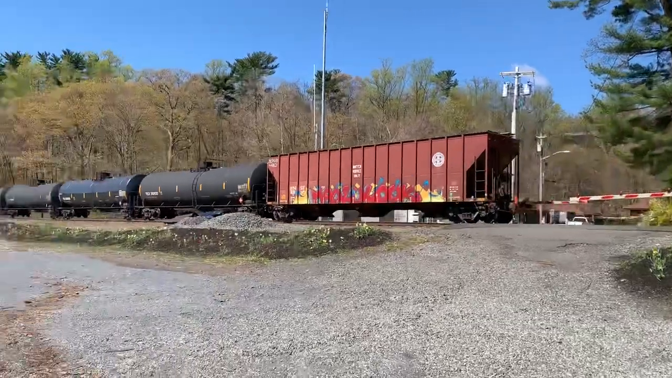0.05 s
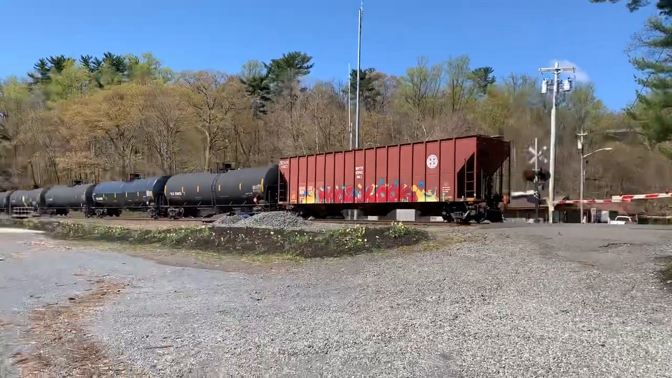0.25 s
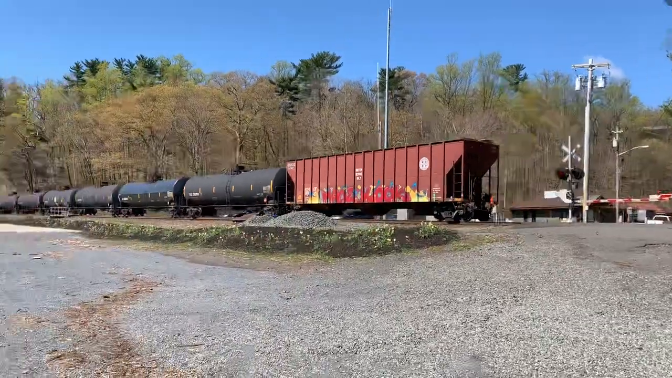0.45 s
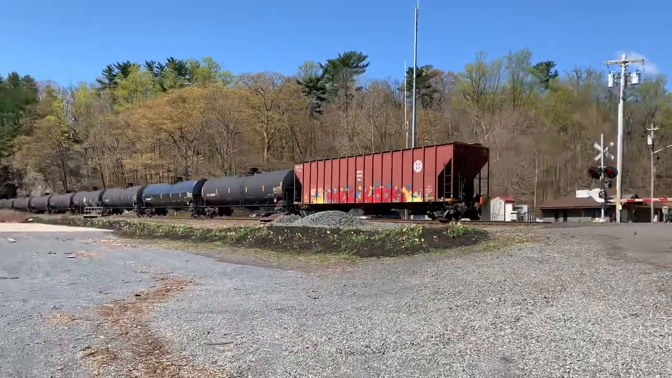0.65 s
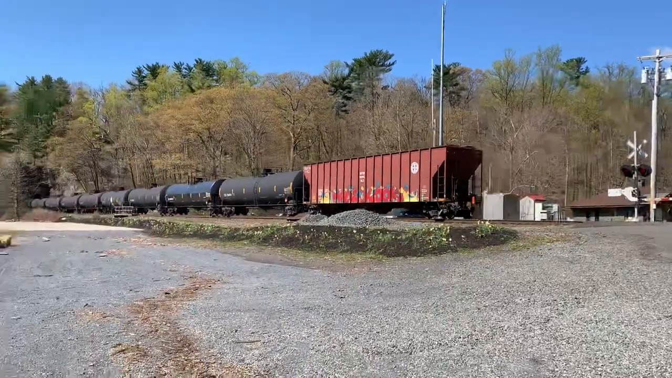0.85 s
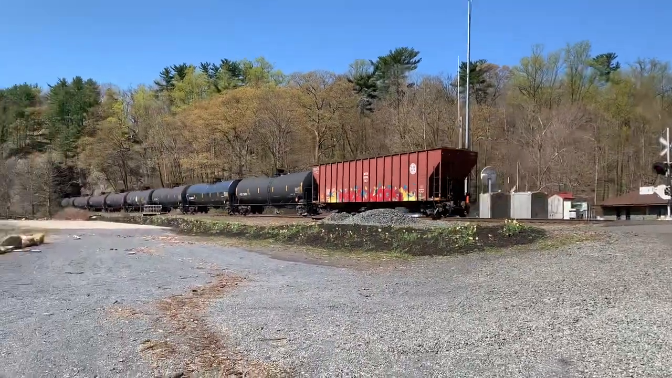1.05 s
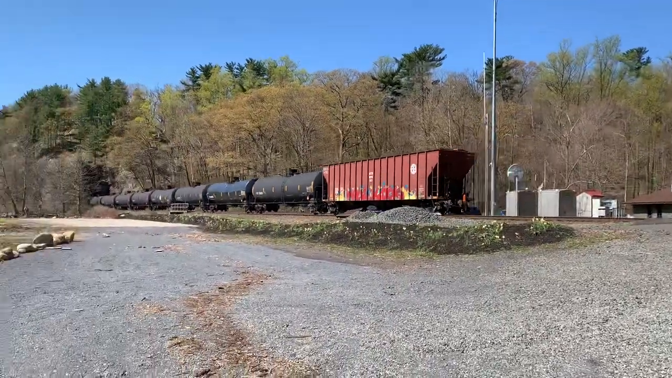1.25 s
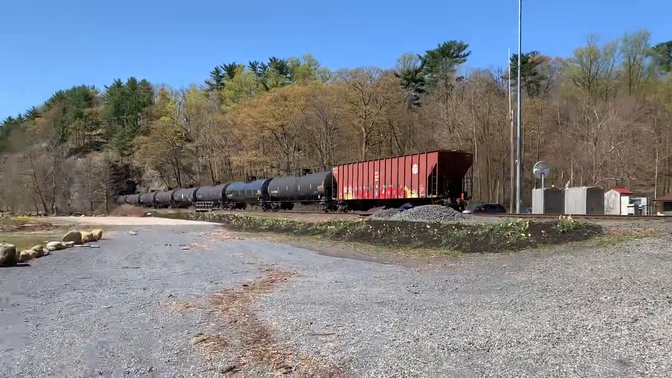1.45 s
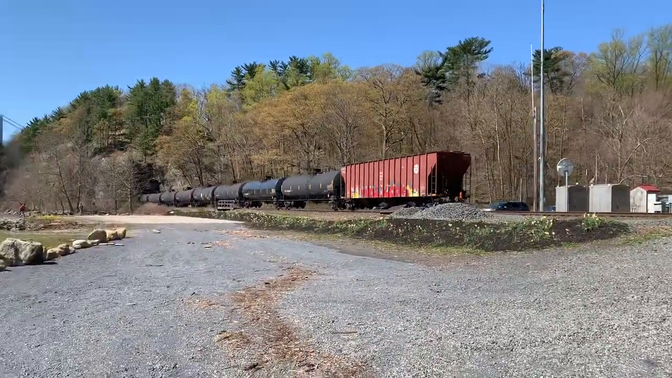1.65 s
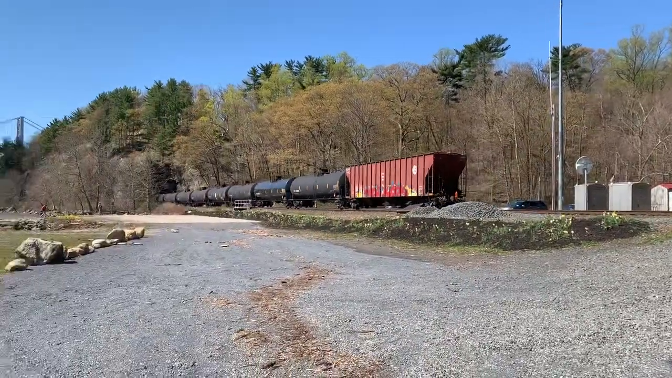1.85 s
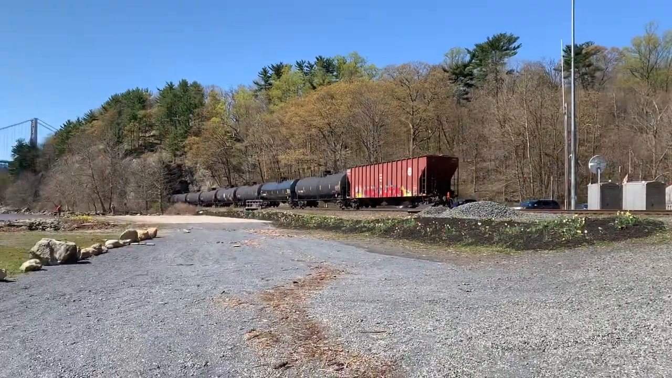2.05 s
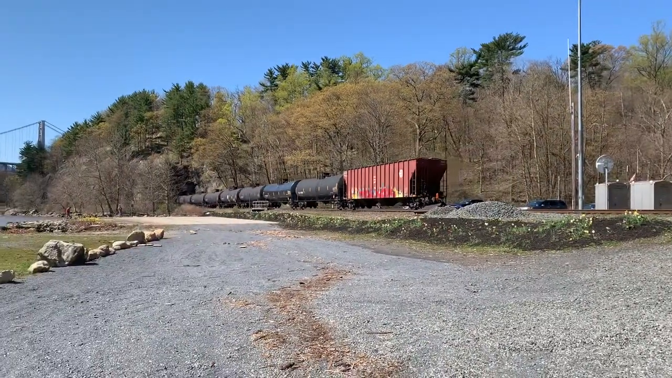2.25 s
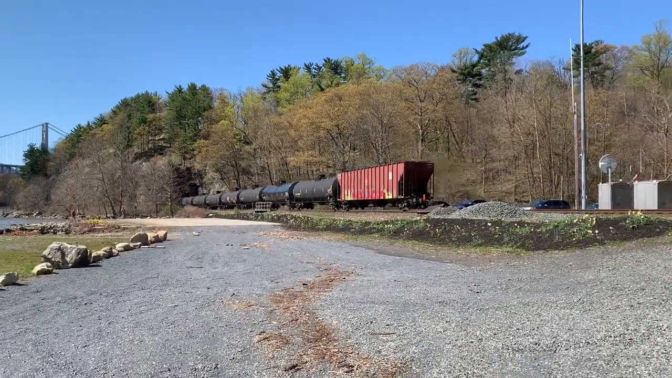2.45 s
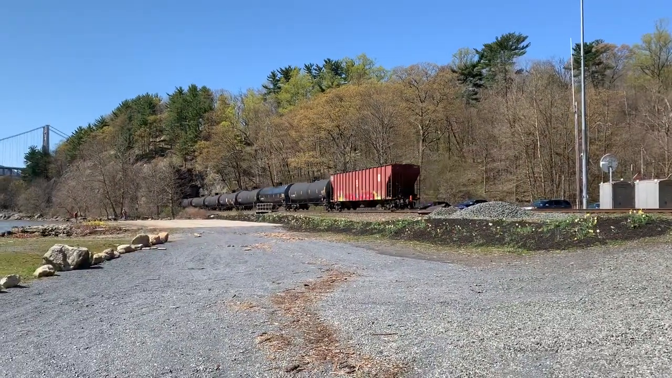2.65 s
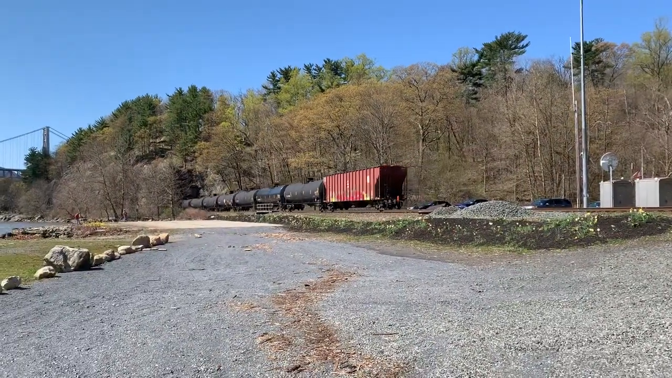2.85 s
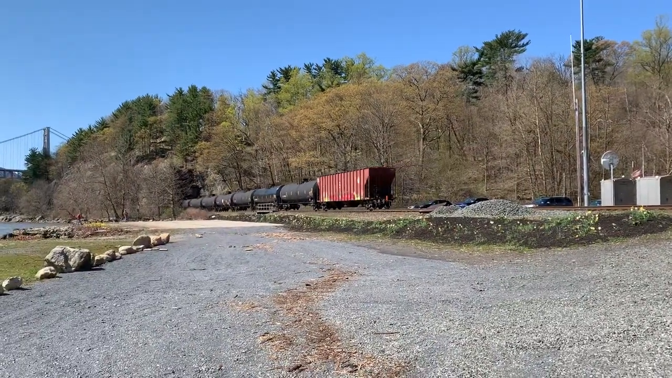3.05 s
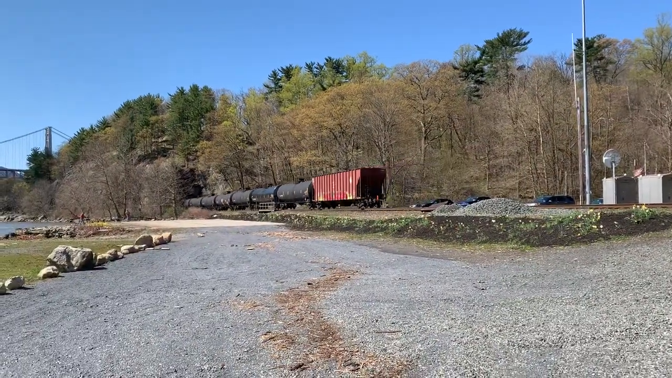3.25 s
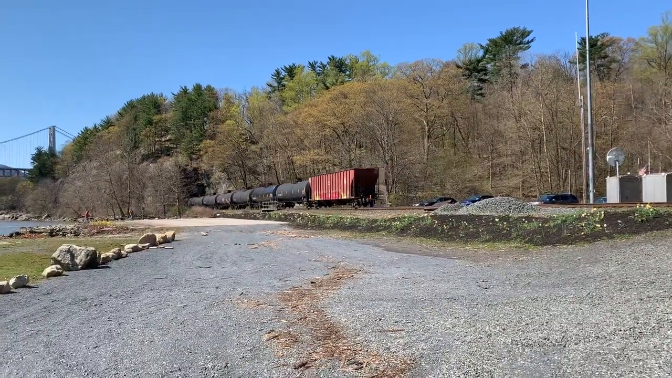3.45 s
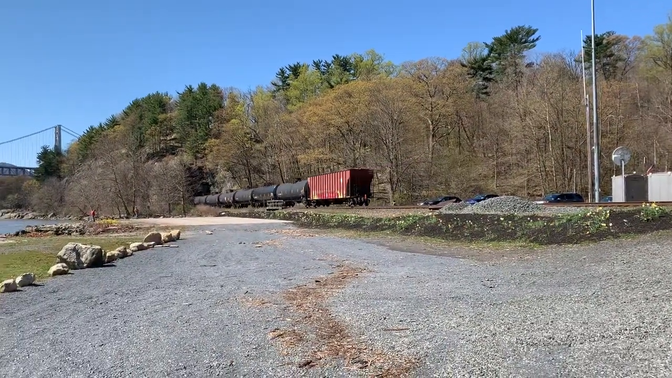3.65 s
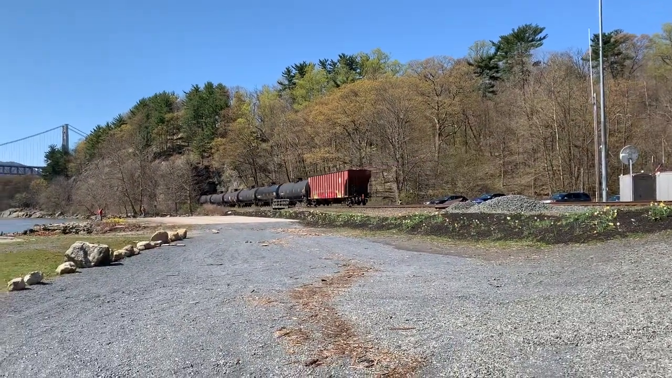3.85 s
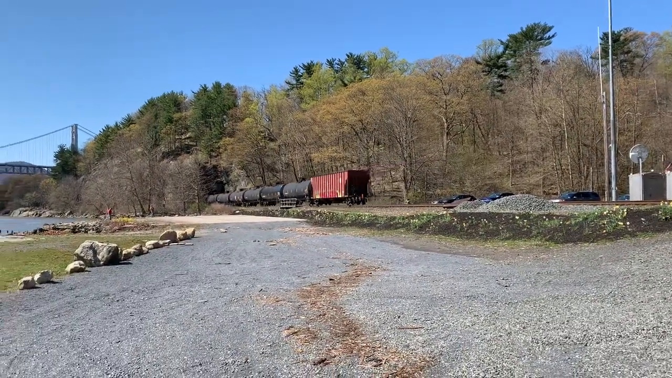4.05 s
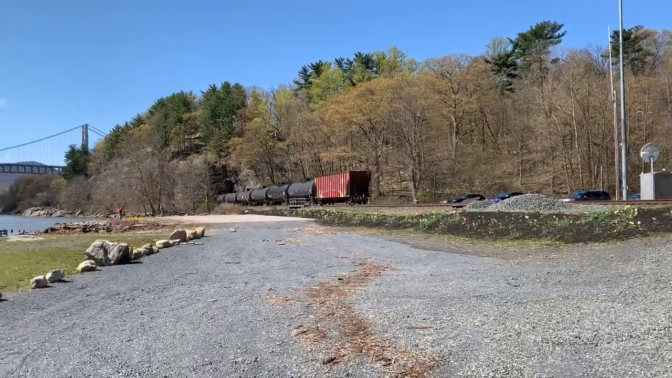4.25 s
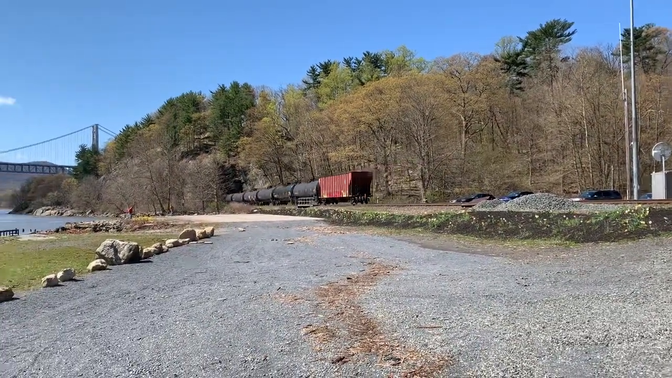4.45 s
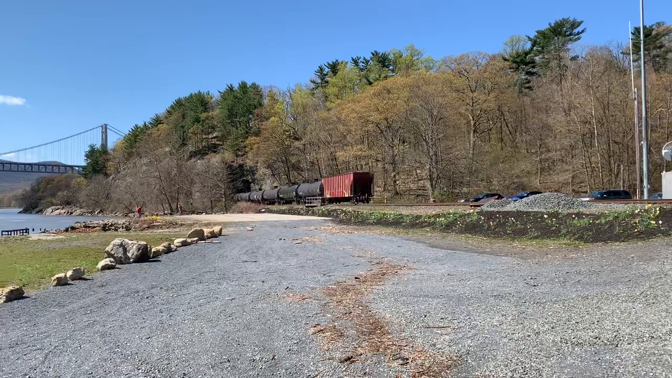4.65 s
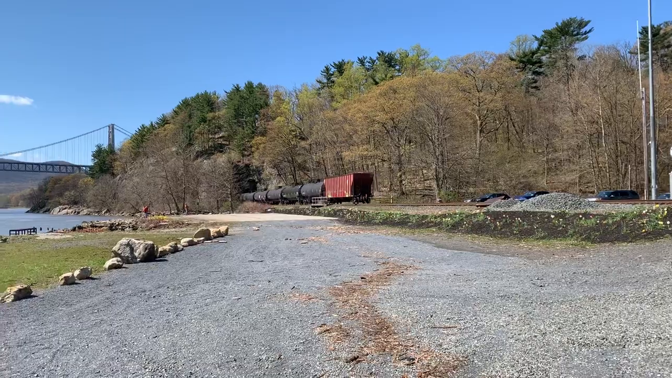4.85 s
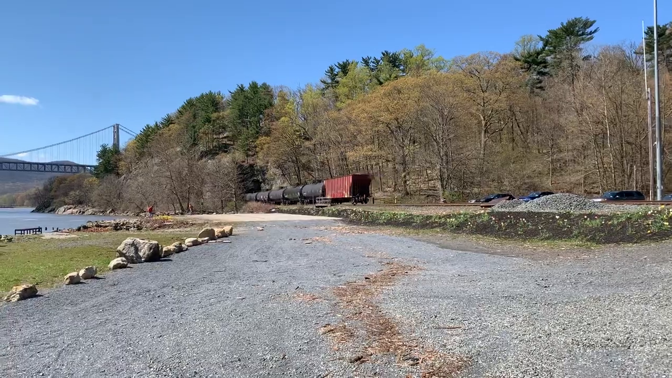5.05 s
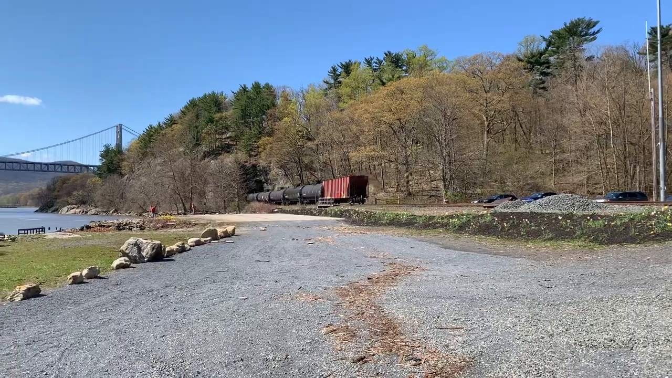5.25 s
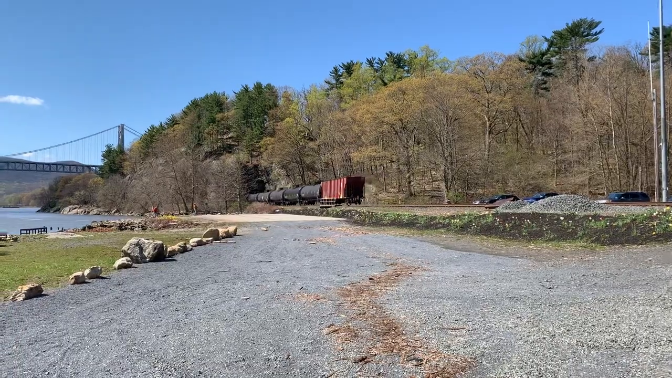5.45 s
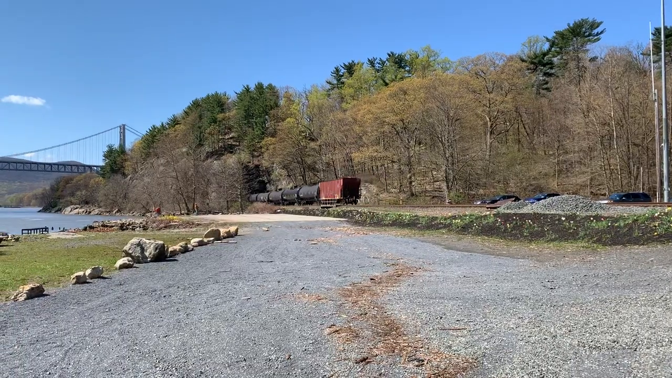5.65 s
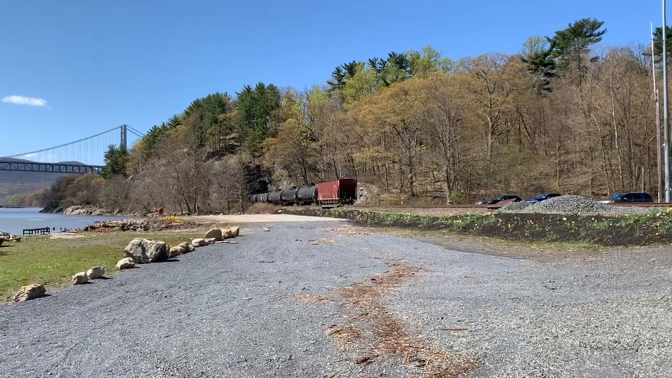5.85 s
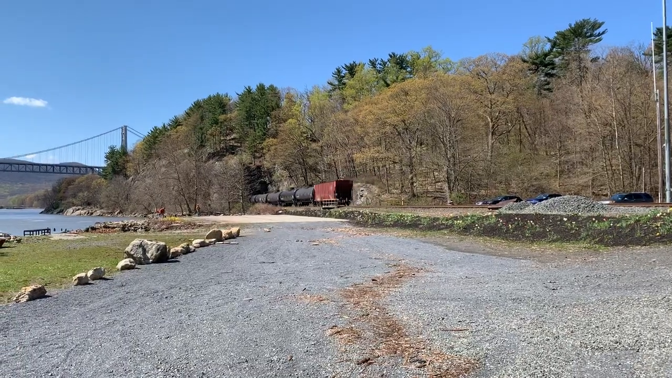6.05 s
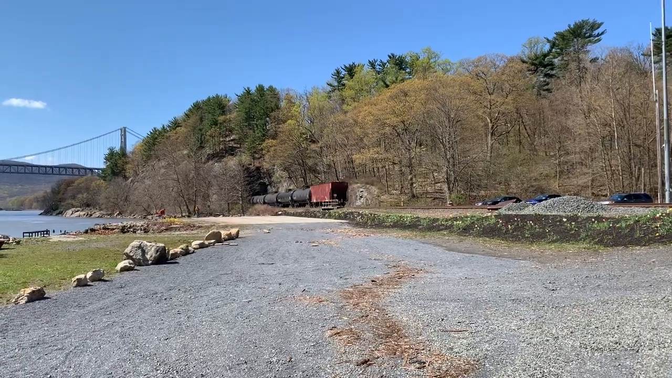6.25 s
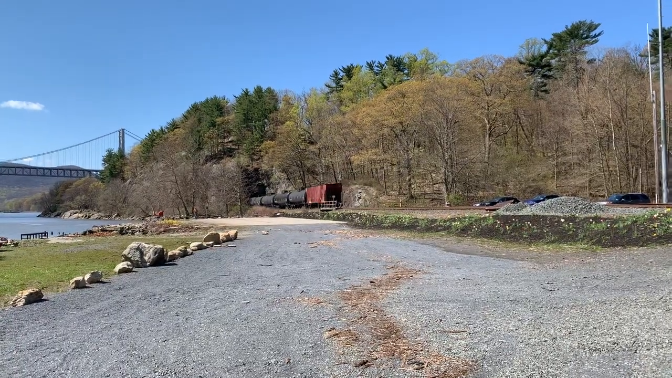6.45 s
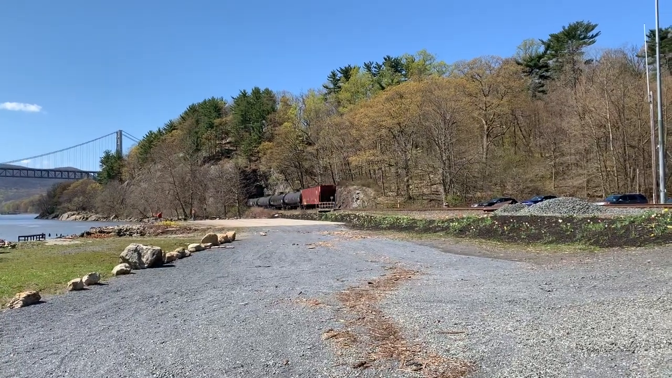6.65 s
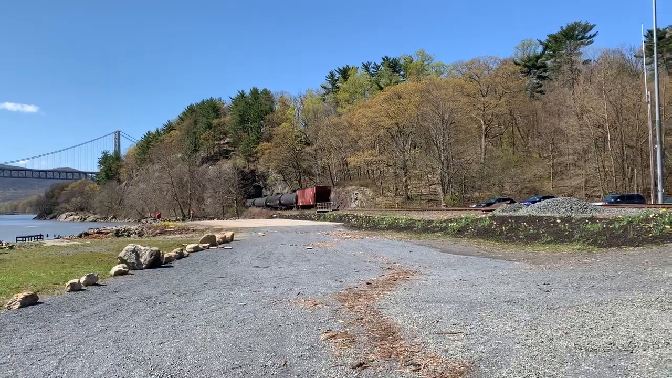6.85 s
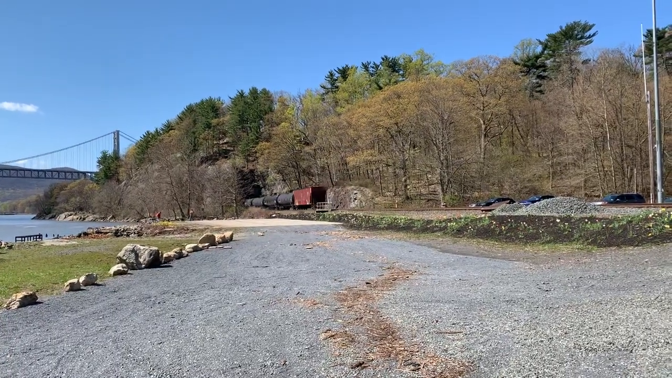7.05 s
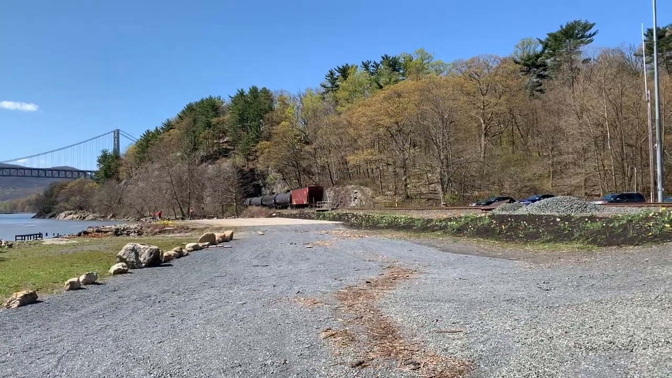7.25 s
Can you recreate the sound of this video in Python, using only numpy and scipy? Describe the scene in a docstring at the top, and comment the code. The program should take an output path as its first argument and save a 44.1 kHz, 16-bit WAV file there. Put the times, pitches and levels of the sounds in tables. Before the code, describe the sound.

Heavy tank cars roll away from a phone in the open air. At first the roar is wide and close, full of irregular wheel knocks, loose metal rattles and low humming shells. Heavy bogie blows punctuate it, strongest around three seconds. Treble then fades faster than the bass, leaving uneven distant rumble with a thin flange whine, soft hiss, a few dry ticks and late tiny squeaks.

```python
"""A gravel lot on a river bank, where a stereo phone hears the last tank cars of a freight train roll away.
Bands of noise make the roar of bogies, cars and wheels; narrow noise and wavering tones make rings and hums.
Short noise bursts, sagging sines and small rings make clacks, rattles, thumps and jangle.
Distance and air dull the train over a faint air hiss; something small ticks close by now and then,
and chirps and squeaks near the end."""
import sys
import numpy as np
from scipy import signal
from scipy.fft import rfft, irfft, next_fast_len
from scipy.io import wavfile
from scipy.ndimage import uniform_filter1d

SR = 44100
rng = np.random.default_rng(int(sys.argv[2]) if len(sys.argv) > 2 else 0)


def volts_from_db(level):
    """Convert decibel levels to linear amplitude ratios."""
    exponent = np.asarray(level, float) / 20
    return 10 ** exponent


def digitize_waveform(pressure):
    """Quantize a signal to 16-bit integers and store it at the path in sys.argv[1].

    Rows of a 2-D input are taken as channels; values are limited to [-1, 1].
    """
    field = np.atleast_2d(pressure).T
    bounded = np.clip(field, -1, 1)
    quanta = np.round(bounded * 32767).astype(np.int16)
    wavfile.write(sys.argv[1], SR, quanta)


N = 322371
T = np.arange(N) / SR  # seconds
SIZE = next_fast_len(N)
F = np.maximum(np.arange(SIZE // 2 + 1) * SR / SIZE, 1)  # Hz
DOUBLING_S = 3.2  # the train has doubled its starting distance after this many seconds
# treble lost to the lengthening air path: dB per second at 1 kHz, and the power of pitch it grows with
AIR_DB_PER_S, AIR_POWER = 0.2026, 1.443


def over_hz(table, hz=F):
    """A (Hz, value) table read on a log-frequency axis."""
    table = np.array(table)
    return np.interp(np.log(hz), np.log(table[:, 0]), table[:, 1])


def over_time(table):
    """The value columns of a timed curve, at every sample."""
    seconds, *columns = np.transpose(table)
    return [np.interp(T, seconds, column) for column in columns]


def walk(rate):
    """A random level of spread near 1: steps held 1 / rate seconds, smoothed twice."""
    hold = int(SR / rate)
    steps = np.repeat(rng.standard_normal(N // hold + 1), hold)
    return 1.104 * uniform_filter1d(uniform_filter1d(steps, hold), hold)[:N]


def hiss(hz, width, size=SIZE):
    """Noise of rms 1 in a bell-shaped band."""
    grid_hz = np.arange(size // 2 + 1) * SR / size
    bell = np.exp(-.5 * ((grid_hz - hz) / width) ** 2)
    noise = irfft(rfft(rng.standard_normal(size)) * bell, size)[:N]
    return noise / np.std(noise)


def tone(hz, db, waver_hz, flutter_db, squash_db=-80):
    """A wavering, fluttering near-sine; squashing adds an octave that grows faster than the tone."""
    level = np.sqrt(2) * volts_from_db(db + flutter_db * walk(30))
    turns = np.cumsum(hz + waver_hz * walk(40)) / SR
    spin = level * np.exp(2j * np.pi * turns)
    return (spin + volts_from_db(squash_db) * spin ** 2).imag


def burst(t, length, rise):
    """An envelope that swells over rise seconds and dies away over length seconds."""
    return (1 - np.exp(-t / rise)) * np.exp(-t / length)


def knock(start_s, db, hz, width, length, rise):
    """A struck sound: a band of noise under a burst envelope, its energy set to the envelope's at db."""
    shape = burst(T[:SR], length, rise)
    noise = shape * hiss(hz, width, size=SR)
    even = np.sqrt(np.sum(shape ** 2) / np.sum(noise ** 2))
    out, start = np.zeros(N + SR), int(start_s * SR)
    out[start:start + SR] = volts_from_db(db) * noise * even
    return out[:N]


def sides(x, pan_db, lag=0):
    """Left and right of a point source: pan is left minus right, a positive lag delays the left by samples."""
    return np.array([volts_from_db(pan_db / 2) * np.roll(x, lag), volts_from_db(-pan_db / 2) * x])


def fading(loss):
    """Level in dB of a receding source that loses loss dB per dB of plain spreading."""
    return -loss * 20 * np.log10(1 + T / DOUBLING_S)


def air_loss(hz, seconds):
    """The dB that the lengthening air path has absorbed at one pitch, more for treble."""
    return AIR_DB_PER_S * (hz / 1000) ** AIR_POWER * seconds


# Colour of the open-air hiss in front. Each row: pitch in Hz, relative level in dB.
AIR_FRONT = [(4120, -23.5), (7000, -12), (8290, -22), (10900, -1.5), (11900, -14.5), (12500, -4),
             (13700, -6.5), (14500, -5), (15000, -35), (15400, -60)]
# Its colour at the sideways pick-up. Each row: pitch in Hz, relative level in dB.
AIR_SIDEWAYS = [(3530, -26.5), (6000, 1), (8310, -17.5), (9320, -14), (10100, -27.5), (11300, -2),
                (13400, -9.5), (15000, -14), (15400, -60.5)]


def air():
    """Open air and microphone hiss: steady coloured noise, left bare as the train recedes."""
    mid, side = (irfft(rfft(rng.standard_normal(SIZE)) * volts_from_db(over_hz(colour)), SIZE)[:N]
                 for colour in (AIR_FRONT, AIR_SIDEWAYS))
    return volts_from_db(-75.5) * np.array([mid + side, mid - side])


# Dry ticks close by. Each row: start in seconds, level in dB, centre in Hz, width in Hz, decay in seconds.
NEAR_TICKS = [(1.467, -60, 13500, 1500, .0006), (1.483, -43, 13300, 1600, .0006),
              (6.19, -57, 4300, 1500, .01), (2.765, -51, 8400, 700, .002), (6.295, -46, 3820, 1600, 0.0061),
              (6.296, -63.5, 9500, 4000, .004), (6.36, -69, 10500, 3000, .015),
              (6.435, -68.5, 10500, 3000, .012)]
# Breathy chirps. Each row: start in seconds, level in dB, centre in Hz, width in Hz, decay in seconds.
NEAR_CHIRPS = [(6.19, -75, 8300, 600, 0.04), (6.335, -70, 8200, 60, 0.05), (6.36, -64, 8500, 450, 0.024),
               (6.425, -64, 8200, 500, 0.022), (7.202, -58, 8430, 150, 0.024),
               (7.2794, -75, 7770, 120, 0.04)]
# Squeaks, one list for each. Each row: time in seconds, pitch in Hz, level in dB before flutter.
NEAR_SQUEAKS = [
    [(6.386, 6205, -80), (6.406, 6210, -63), (6.418, 6165, -72), (6.432, 6175, -62), (6.446, 6215, -52),
     (6.486, 6250, -47), (6.51, 6285, -56), (6.532, 6310, -64), (6.541, 6270, -79), (6.552, 6245, -67),
     (6.565, 6270, -77), (6.58, 6285, -72), (6.59, 6275, -78), (6.6, 6270, -70), (6.612, 6250, -80),
     (6.625, 6250, -69), (6.638, 6240, -85), (6.655, 6260, -73), (6.68, 6260, -90)],
    [(6.43, 6620, -85), (6.46, 6680, -79), (6.495, 6730, -76), (6.525, 6640, -80), (6.54, 6610, -83),
     (6.56, 6590, -69), (6.58, 6570, -88)],
    [(7.22, 6560, -80), (7.228, 6560, -57), (7.243, 6560, -59), (7.25, 6540, -70), (7.262, 6540, -82)],
    [(7.244, 6850, -82), (7.252, 6870, -62), (7.26, 6900, -68), (7.268, 6960, -62), (7.285, 6900, -69),
     (7.305, 6860, -80)],
]


def nearby():
    """Noise bursts tick and chirp close to the microphone; sliding tones with an octave squeak."""
    ticks = sum(knock(*row, 0.34 * row[-1]) for row in NEAR_TICKS)
    chirps = sum(knock(*row, 0.01) for row in NEAR_CHIRPS)
    squeaks = 0
    for rows in NEAR_SQUEAKS:
        sounding = (T > rows[0][0]) * (T < rows[-1][0])
        squeaks = squeaks + sounding * tone(*over_time(rows), 9, 1.4, squash_db=25)
    return sides(ticks, -2.5, lag=1) + sides(chirps, -14.5) + sides(squeaks, .3)


def jangle(count=600):
    """Small steel parts ring for a few hundredths of a second at random pitches, fainter as the train recedes."""
    out, t = np.zeros((2, N + SR)), T[:SR // 4]
    distance_db = fading(1.06)
    for when, pitch, size, place in rng.random((count, 4)):
        start, hz = int(when * N), 450 * 16 ** pitch
        ring = burst(t, 0.037, 0.0039) * np.sin(2 * np.pi * hz * t)
        # a few parts ring far louder than the rest, and high ones ring softer
        db = -41.5 - 7 * np.log2(hz / 450) - 3.3 * np.log(size + 0.042)
        db += distance_db[start] - air_loss(hz, T[start])
        out[:, start:start + len(t)] += volts_from_db(db) * sides(ring, 3 * (place - .6), lag=int(8 * place) - 5)
    return out[:, :N]


# Brief rings of loose steel, and at 3.285 s the noisy body of a heavy blow. Each row: start in seconds, level
# in dB, centre in Hz, width in Hz, decay in seconds.
LOOSE_STEEL = [(0.0094, -32, 1050, 310, 0.03), (0.12, -43, 2920, 240, 0.04),
               (0.208, -32.5, 940, 250, 0.027), (0.73, -35.5, 2050, 120, 0.054),
               (0.887, -54, 7800, 98, 0.017), (2.02, -44.5, 780, 60, 0.097),
               (2.795, -38.5, 2130, 120, 0.023), (2.815, -37, 1700, 450, 0.044),
               (2.79, -43, 4300, 250, 0.023), (3.285, -24, 230, 120, 0.02), (3.4, -29.5, 200, 32, .06),
               (3.995, -44, 1300, 560, .04), (4.25, -53, 5800, 260, 0.08), (0.127, -27.5, 312, 23, 0.11),
               (.4, -27, 324, 23, .1), (.66, -26, 220, 23, 0.042), (0.548, -27, 332, 18, 0.21),
               (1.7, -52, 6200, 400, 0.033), (.36, -37.5, 715, 42, 0.12), (1.02, -40, 660, 85, 0.11),
               (1.27, -39.5, 2110, 150, 0.074), (1.28, -42, 730, 68, .07), (1.48, -43.5, 2330, 25, .12),
               (1.66, -43, 2050, 60, 0.043), (.8, -43, 1440, 69, 0.17), (3.707, -33, 257.5, 3.7, 0.29),
               (5.01, -59, 6800, 1100, 0.078), (4.78, -69, 13300, 540, 0.17)]


def rattles():
    """Loose plates and couplings ring briefly around one pitch each; one burst gives a heavy blow its noisy
    body."""
    return sides(sum(knock(*row, 0.12 * row[-1]) for row in LOOSE_STEEL), -1.1, lag=-1)


# Heavy blows of bogies and couplings.
# Each row: start in seconds, level in dB before a doubling, starting pitch in Hz, decay in seconds.
HEAVY_BLOWS = [(.22, -21.5, 150, 0.028), (0.669, -21, 109, 0.028), (1.77, -19.5, 110, 0.018),
               (2.211, -25, 62, 0.044), (2.383, -24, 100, .04), (2.44, -24, 70, .03),
               (2.78, -26, 90, 0.032), (3.263, -15.5, 87.7, .017), (3.295, -14.5, 92, .022),
               (3.401, -22, 65, 0.027), (3.499, -21, 132.6, 0.023), (4.45, -27, 120, 0.028),
               (5.81, -26, 65.6, 0.044)]


def thumps():
    """Each blow swings a heavy frame for a few cycles, sagging a little in pitch."""
    out = 0
    for start, db, hz, length in HEAVY_BLOWS:
        since = T - start
        cycles = hz * since * (1 - .3 * since) + rng.random()
        envelope = burst(np.maximum(since, 0), length, .3 * length)
        out = out + 2 * volts_from_db(db) * envelope * np.sin(2 * np.pi * cycles)
    return sides(out, -1.4)


# Wheels over rail joints. Each row: start in seconds, level in dB, centre in Hz, decay in seconds.
RAIL_JOINTS = [(0.112, -53, 3000, 0.08), (0.369, -46, 3900, 0.044), (0.6, -47, 3170, 0.032),
               (0.784, -53.5, 4000, 0.024), (1.075, -42.5, 3400, 0.029), (1.486, -49, 4220, 0.041),
               (1.655, -45, 4320, 0.058), (1.735, -44.5, 4500, 0.033), (2.005, -47, 4700, 0.04),
               (2.082, -47, 4600, 0.04), (2.365, -52, 4240, 0.055), (2.652, -61, 4500, 0.037),
               (2.799, -45, 4170, 0.04), (3.116, -52, 4470, 0.045), (3.973, -63, 5250, 0.05)]


def clacks():
    """Each joint is a smeared knock of steel: a ring with a duller blow below it and a brighter splash above."""
    out = 0
    for start, db, hz, length in RAIL_JOINTS:
        out = out + knock(start, db, hz, 600, length, 0.0069)
        out = out + knock(start, db, 1800, 700, length, 0.008)
        out = out + knock(start, db - 4.5, 6700, 2200, 0.81 * length, 0.0055)
    return sides(out, -.7, lag=-1)


# Thin flange squeal. Each row: time in seconds, level in dB before flutter.
FLANGE_SQUEAL = [(2.9, -72), (3.0, -65), (3.07, -73), (3.15, -69), (3.35, -79), (3.4, -65), (3.46, -70),
                 (3.55, -66), (3.62, -76), (3.68, -72), (3.76, -60), (3.84, -70), (3.92, -65), (4.02, -61),
                 (4.15, -65), (4.22, -67), (4.31, -63), (4.37, -80), (4.44, -64), (4.52, -70), (4.6, -66),
                 (4.68, -80), (4.76, -74), (4.87, -70), (4.92, -82), (5.05, -82), (5.12, -73), (5.25, -69),
                 (5.32, -90), (5.43, -77), (5.55, -77), (5.6, -92), (5.68, -92), (5.71, -72), (5.83, -82),
                 (5.92, -73), (5.98, -84), (6.1, -77), (6.18, -90), (6.36, -88), (6.42, -79), (6.56, -84),
                 (6.62, -80), (6.84, -75), (6.92, -86), (6.99, -71), (7.06, -94), (7.31, -92)]


def squeal():
    """A thin wavering flange tone that sags 3 Hz per second, passing 5203 Hz at 4 s."""
    hz = 5203 - 3 * (T - 4)
    return sides((T > FLANGE_SQUEAL[0][0]) * tone(hz, *over_time(FLANGE_SQUEAL), 8, 2.2), 1.5)


# Low drone of the track. Each row: time in seconds, level in dB before flutter.
TRACK_DRONE = [(0.0, -30), (0.35, -57), (0.69, -28), (0.83, -41), (1.91, -52), (2.26, -39), (2.46, -43),
               (2.87, -54), (3.34, -41), (3.58, -46), (4.23, -36), (4.36, -49), (5.16, -55), (5.2, -27.5),
               (5.31, -27), (5.35, -48), (5.86, -41), (6.07, -38.5), (7.31, -41)]


def drone():
    """The track drones as a fluttering tone that wavers around 61 Hz."""
    return sides(tone(61, *over_time(TRACK_DRONE), 2.52, 2), -1.4)


# Tank shell hum. Each row: time in seconds, level in dB before flutter and a 1.5 dB cut.
SHELL_HUM = [(0.0, -39), (0.16, -29), (0.2, -41), (0.39, -28), (0.45, -38), (0.53, -30), (0.59, -57),
             (0.71, -32), (1.18, -26), (1.3, -31), (1.38, -26.5), (1.75, -36.5), (2.06, -21), (2.12, -31),
             (2.42, -26.5), (2.5, -49), (2.58, -27.5), (3.05, -35), (3.07, -41.5), (3.48, -30.5),
             (4.05, -34), (4.15, -51), (4.23, -28.5), (4.38, -44.5), (4.42, -35), (4.78, -33.5),
             (4.87, -46), (4.95, -31.5), (5.03, -50), (5.11, -35), (5.58, -45), (5.74, -30.5),
             (5.78, -45.5), (6.51, -39.5), (7.23, -43.5), (7.31, -51)]


def hum():
    """The tank shells hum as a tone that wavers around 129.4 Hz, its level fluttering at two rates."""
    return sides(tone(129.4, *over_time(SHELL_HUM), 3, 3.2) * volts_from_db(1.2 * walk(14) - 1.5), -1.4)


# Ringing modes of wheels and shells.
# Each row: pitch in Hz, width in Hz, level in dB before a common 7 dB lift and the fading.
RINGING_MODES = [(192, 14, -40.5), (267, 11.6, -40.5), (301, 5.2, -57), (336, 6.4, -49.5), (675, 15, -58.5),
                 (1006, 5.1, -68.5), (1553, 20, -58), (2058, 62, -57.5), (2335, 21, -56.5), (3635, 17, -65),
                 (3850, 44, -65), (4330, 20, -64), (6120, 30, -73.5), (6900, 31, -75.5)]


def wheels():
    """The rough rail keeps each mode ringing as flickering narrow noise that fades faster than the roar."""
    distance_db = np.minimum(fading(1.56), -2.5)  # level at first, then receding
    out = 0
    for hz, width, db in RINGING_MODES:
        level = db + 7 + distance_db - air_loss(hz, T) + 1.6 * walk(6)
        pan_db = 1.3 * rng.standard_normal() - 1.2
        out = out + sides(volts_from_db(level) * hiss(hz, width), pan_db, lag=-2)
    return out


# Middle of each part of the roar, in Hz:
# bogies, frames, car sides, wheel-on-rail, flange hiss, lower treble, upper treble.
PART_HZ = [65, 180, 340, 1100, 3600, 6200, 9000]
# Loss of each part above the bogies, in dB per dB of plain spreading, in the same order.
PART_LOSS = [1.09, 1.11, 1.12, 0.89, 0.74, 0.92]
# Surges of the bogie rumble. Each row: time in seconds, relative level in dB before random swings.
BOGIE_SURGES = [(0.0, -32), (0.04, -23), (0.14, -32), (0.3, -26), (0.37, -38.5), (0.41, -26), (0.49, -34),
                (0.53, -27), (1.73, -31.5), (1.75, -26.5), (1.93, -39.5), (1.99, -27), (2.16, -30),
                (2.18, -39), (2.24, -22.5), (2.28, -33), (2.46, -25.5), (2.48, -31), (3.22, -31),
                (3.28, -21.5), (3.58, -33.5), (4.27, -30), (4.34, -42.5), (4.44, -28.5), (4.5, -37.5),
                (4.68, -29), (4.8, -37), (4.89, -29.5), (5.15, -33), (5.21, -27.5), (5.31, -27.5),
                (5.35, -34), (5.5, -32.5), (5.52, -39), (5.82, -31), (5.96, -33), (6.82, -31), (6.88, -39),
                (6.92, -30), (7.31, -37)]


def parts():
    """Level in dB of each part: the bogies surge and shake the frames, the parts above them fade with distance."""
    bogies = over_time(BOGIE_SURGES)[0]
    receding = [fading(loss) - air_loss(hz, T) for loss, hz in zip(PART_LOSS, PART_HZ[1:])]
    levels = np.array([bogies] + receding)
    levels[1] += 0.31 * (bogies - uniform_filter1d(bogies, SR))  # frames share the surges
    levels[:3] += [walk(7) for _ in range(3)]  # the bass parts lurch apart
    levels[3] += 1.33 * walk(9)  # wheel-on-rail comes in clumps
    levels[4:] += 1.2 * walk(10)  # the treble parts clatter together
    return levels


# Brief or slow rises and dips around one pitch, the last perhaps distant traffic coming up.
# Each row: middle in seconds, spread in seconds, change in dB, pitch in Hz, spread in octaves.
RISES_AND_DIPS = [(0.1, 0.18, -4, 151, 0.67), (2.73, 0.72, 3.5, 7500, 0.5), (.35, .5, 3, 3140, 0.17),
                  (1, .5, -4, 5050, .08), (2.6, .4, 3, 200, 0.19), (.7, 0.37, -2.5, 1780, .1),
                  (0.47, 0.22, 4, 360, .4), (2.15, 0.63, 3.5, 4300, .25), (2.833, 0.026, 6, 1650, .8),
                  (3.08, 0.088, -4.5, 160, 0.26), (3.398, 0.13, 3, 164, 0.31), (3.7, .3, -1, 400, .3),
                  (6.5, .7, 1.5, 260, .3), (5.5, 1.0, -1.5, 740, 0.19), (5.7, 1.2, 2.5, 2100, 0.69),
                  (1.5, .3, 3.5, 9500, .3), (4.016, 0.021, 3.5, 3500, 2.5), (4.37, 0.15, 8.5, 6900, .6),
                  (5.17, 0.11, 16, 9100, 0.48), (7.36, 0.32, 4, 1600, 1.4)]


def swells(hz):
    """Extra dB at one pitch: every rise or dip is a bell in both time and pitch."""
    extra = 0
    for middle, spread, db, mid_hz, octaves in RISES_AND_DIPS:
        nearness = np.exp(-.5 * (np.log2(hz / mid_hz) / octaves) ** 2)
        extra = extra + db * nearness * np.exp(-.5 * ((T - middle) / spread) ** 2)
    return extra


def bands(levels, front, across):
    """Overlapping bands a third of an octave apart follow their part of the roar and flicker alone."""
    # each part keeps its mean power, so only its movement is heard
    swing = levels - 10 * np.log10(np.mean(volts_from_db(2 * levels), axis=1, keepdims=True))
    out, shared = 0, walk(3.1)
    narrowing_db = 1.5 - .6 * T  # the train shrinks from a wide angle towards a point as it leaves
    for hz in 22 * 2 ** np.arange(0, 9.7, 1 / 3):
        mask = np.cos(np.pi * np.clip(1.5 * np.log2(F / hz), -.5, .5)) ** 2
        place = np.interp(np.log(hz), np.log(PART_HZ), np.arange(len(PART_HZ)))
        k = min(int(place), len(PART_HZ) - 2)
        blend = np.clip(1.57 * (place - k - .5) + .5, 0, 1)
        bright = min(hz / 14000, 1)
        db = (1 - blend) * swing[k] + blend * swing[k + 1] + swells(hz)
        db = db + 0.79 * bright * shared  # swing common to the treble
        db = db + walk(2.436) + (0.82 + 1.2 * bright) * walk(12)  # slow wander and quick flicker
        mid, side = irfft(np.array([front, across]) * mask, SIZE)[:, :N]
        side = side * volts_from_db(narrowing_db * np.exp(-np.log2(hz / 1700) ** 2))  # strongest at 1.7 kHz
        out = out + volts_from_db(db) * np.array([mid + side, mid - side])
    return out


# Colour of the roar in front. Each row: pitch in Hz, relative level in dB.
ROAR_FRONT = [(15, -46), (25, -34), (59, 2.5), (131, -3.5), (158, -4.5), (335, -11), (475, -24),
              (2300, -30.5), (2630, -40.5), (4370, -41.5), (8310, -54), (10900, -62), (11800, -78),
              (13100, -67.5), (15000, -82), (15400, -120)]
# Its colour at the sideways pick-up. Each row: pitch in Hz, relative level in dB before a 15 dB cut.
ROAR_SIDEWAYS = [(15, -38.5), (25, -11), (54, 1.5), (125, -4), (285, -8), (462, -16), (620, -11.5),
                 (1240, -21.5), (1630, -18.5), (3830, -26), (5140, -27.5), (9010, -37), (10300, -53),
                 (11500, -47), (15000, -68), (15400, -110)]
# How far the sideways pick-up copies the front. Each row: pitch in Hz,
# share a quarter cycle early (-1 to 1, negative is late), share in step towards the left (-1 to 1).
COPIED_SHARES = [(100, .01, -.5), (300, .01, -.3), (600, -.3, -.3), (1300, .01, -0.05), (2200, .5, -.2),
                 (3000, .3, .01), (3900, -.1, -.1), (4500, .5, .1), (6000, .4, -.2), (7800, -.3, -.1),
                 (8600, .3, -.3)]
# Where the phone's two ports add up or cancel.
# Each row: pitch in Hz, width in Hz, change in front in dB, change sideways in dB.
PORT_RIPPLES = [(28, 5.8, 12.5, 3.5), (740, 72, 0, -1.5), (398, 14.7, 3.5, -1), (460, 19, -2.1, -2.5),
                (992, 33, -2, 3.5), (1660, 61, 0, 5), (1794, 53, -1, -5.5), (2176, 180, 1.9, 2.5),
                (2590, 100, -2, -3.5), (2960, 90, -2.5, 3), (3400, 280, -1.5, 2.5), (3940, 87, 2.5, -3.5),
                (4510, 280, 2.5, -1), (4860, 120, -6.5, 1.5), (5350, 40, -3.5, 10), (5450, 150, -1, -1.5),
                (6520, 450, 4, -6), (7430, 320, -2, -3), (8560, 280, 3, 1.5), (10500, 290, 3.5, -15.5),
                (13000, 900, 0, -0.5)]


def roar():
    """Rail roughness shakes wheels and cars into a wide roar that reaches both ports of the phone."""
    source, other = (rfft(rng.standard_normal(SIZE)) for _ in range(2))
    shares = np.array(COPIED_SHARES)
    quarter, left = (over_hz(shares[:, [0, k]]) for k in (1, 2))
    ripple_front, ripple_side = sum(np.outer(dbs, np.exp(-.5 * ((F - hz) / width) ** 2))
                                    for hz, width, *dbs in PORT_RIPPLES)
    front = source * volts_from_db(over_hz(ROAR_FRONT) + ripple_front)
    across = (left + 1j * quarter) * source + np.sqrt(1 - quarter ** 2 - left ** 2) * other
    across = across * volts_from_db(over_hz(ROAR_SIDEWAYS) - 15 + ripple_side)
    out = bands(parts(), front, across)
    return out * volts_from_db(-27.5) / np.std(out)


# The phone turns to follow the train. Each row: time in seconds, left minus right in dB.
PHONE_TURN = [(0, -0.1), (1.2, -.2), (2.2, -0.1), (3.2, 1), (4.2, -0.4), (5.5, -0.2), (6.5, -0.4),
              (7.31, -.2)]


def turning(train):
    """Tilts the balance of the train between left and right as the phone turns."""
    return train * volts_from_db(np.outer([.5, -.5], over_time(PHONE_TURN)[0]))


def scene():
    """The receding train, the small near sounds and the air."""
    train = jangle() + rattles() + thumps() + clacks() + squeal() + drone() + hum() + wheels() + roar()
    return air() + nearby() + turning(train)


def band_limit(x):
    """A steep low-pass at the top of the band."""
    return signal.sosfilt(signal.butter(12, 16000, fs=SR, output="sos"), x)


def record(dry):
    """The finished mix as the phone stores it."""
    return band_limit(dry)


dry = scene()
out = record(dry)
digitize_waveform(out)
```